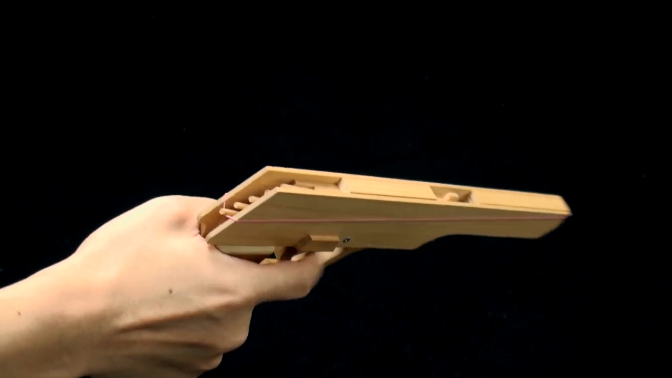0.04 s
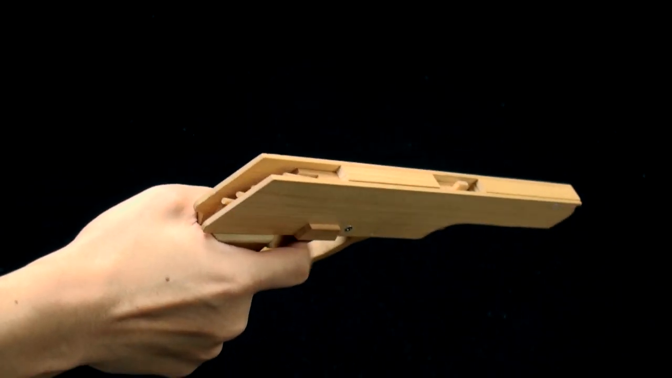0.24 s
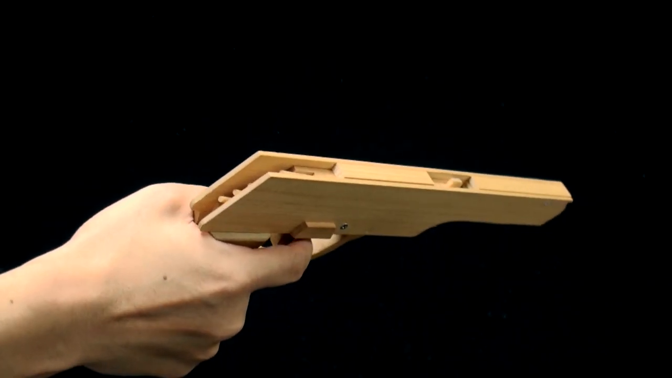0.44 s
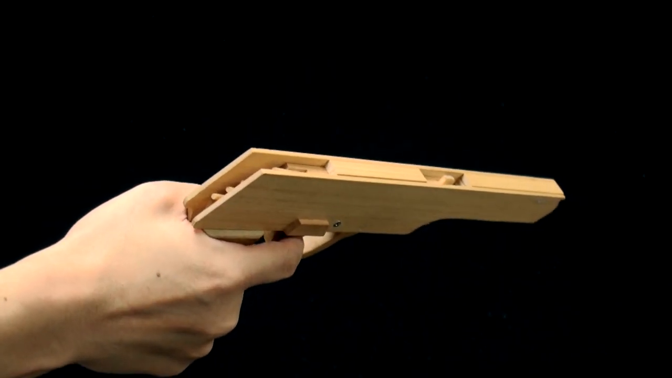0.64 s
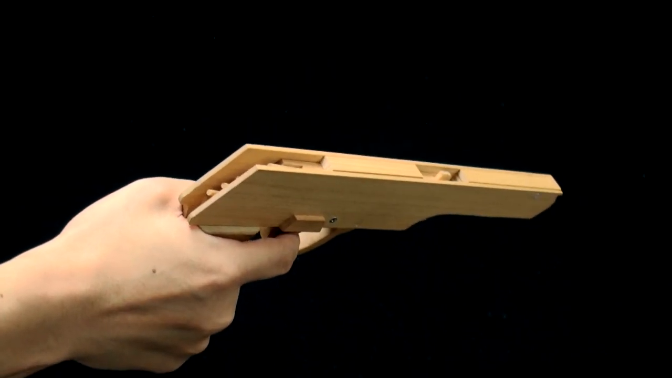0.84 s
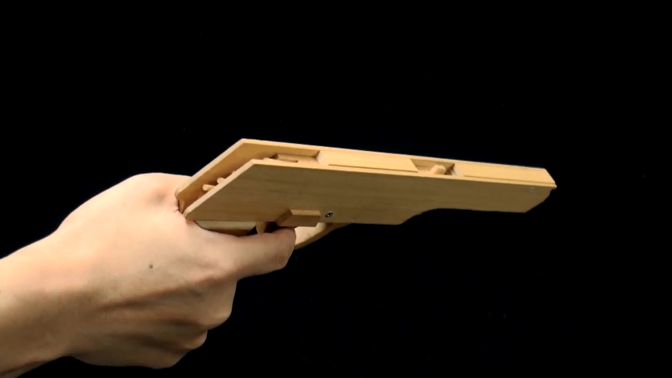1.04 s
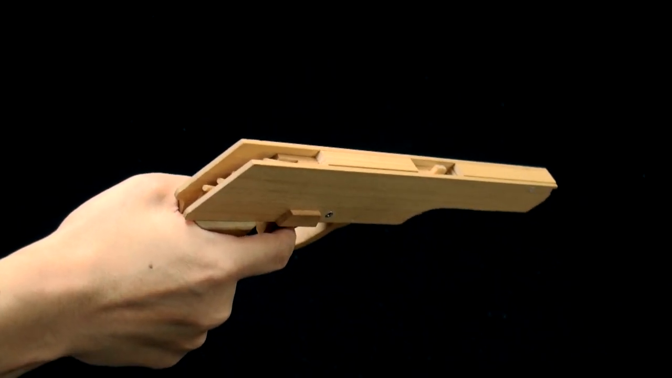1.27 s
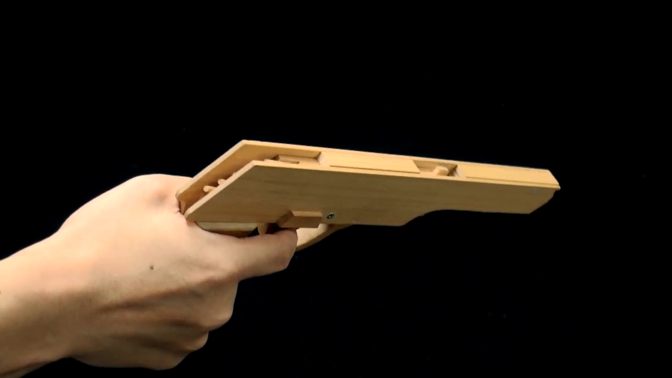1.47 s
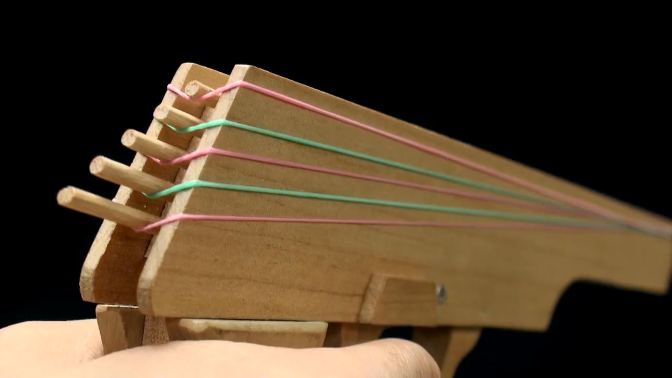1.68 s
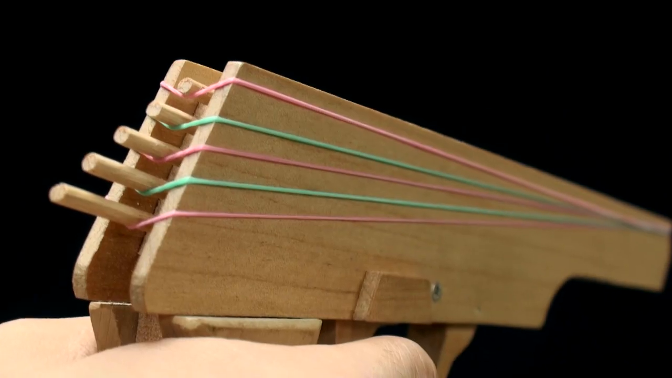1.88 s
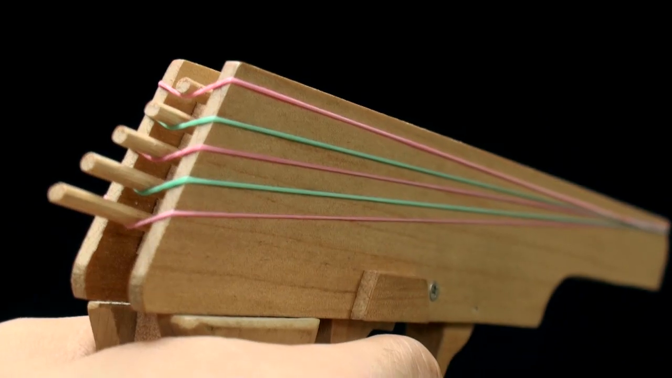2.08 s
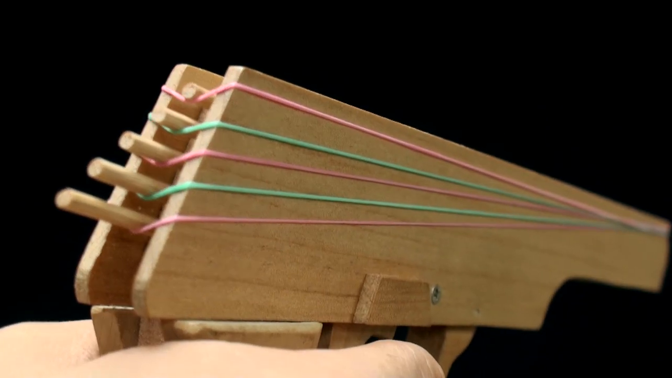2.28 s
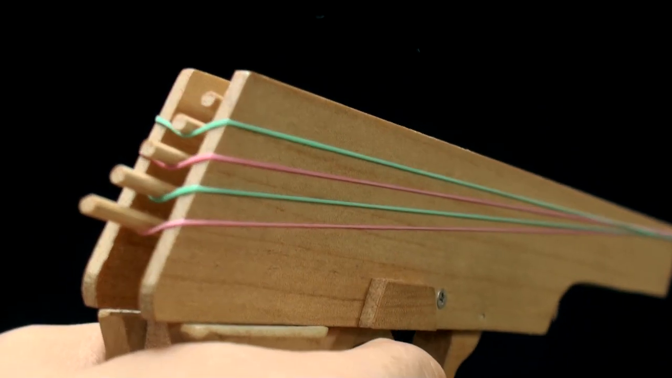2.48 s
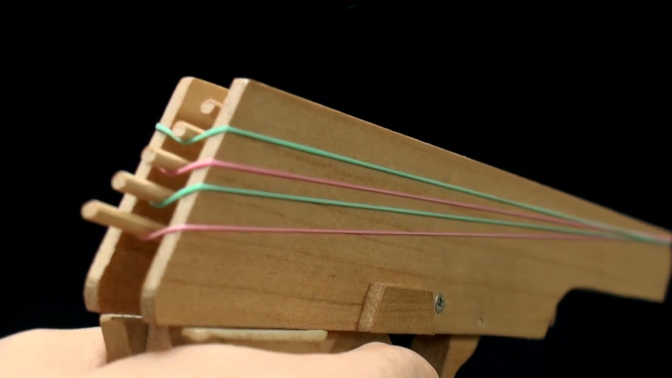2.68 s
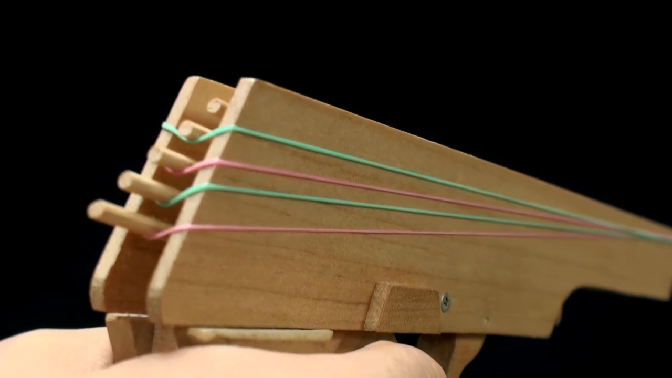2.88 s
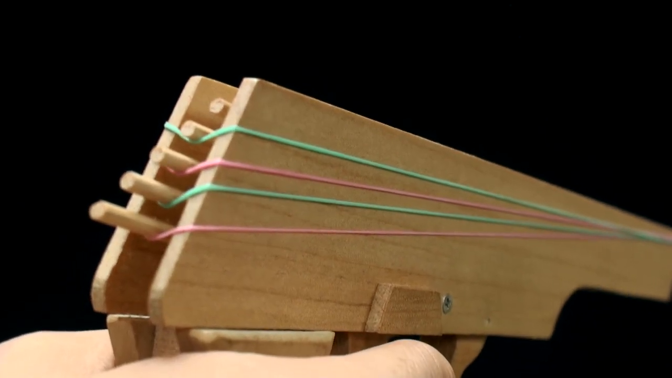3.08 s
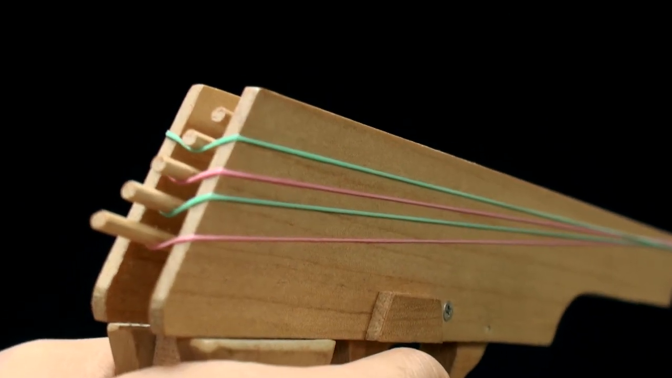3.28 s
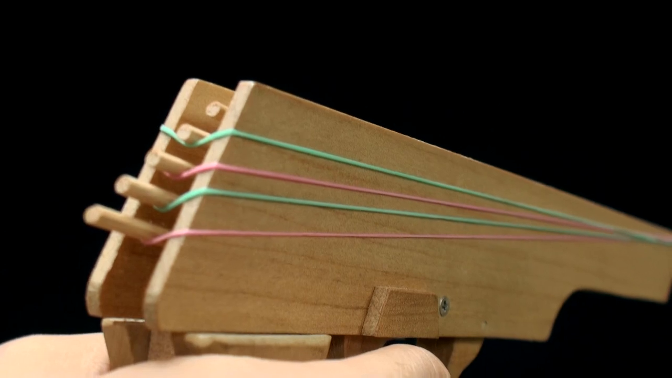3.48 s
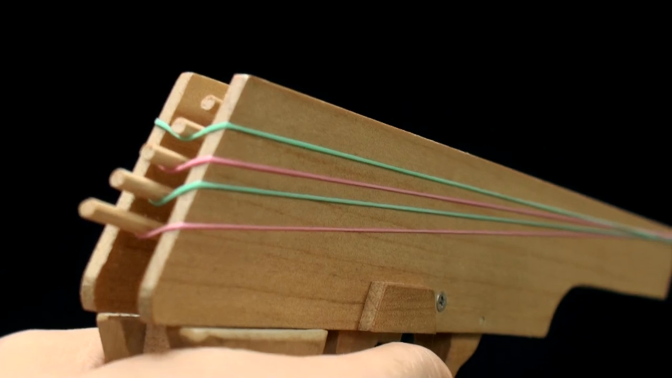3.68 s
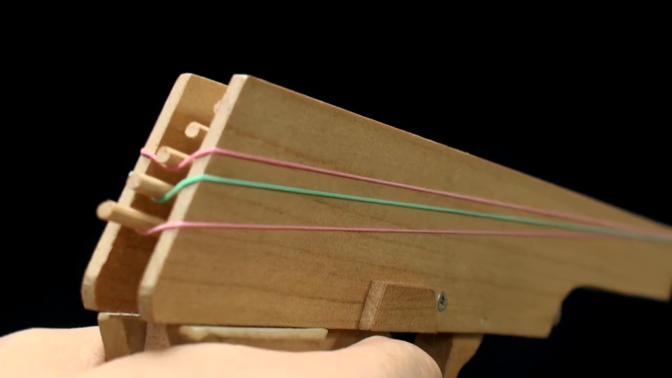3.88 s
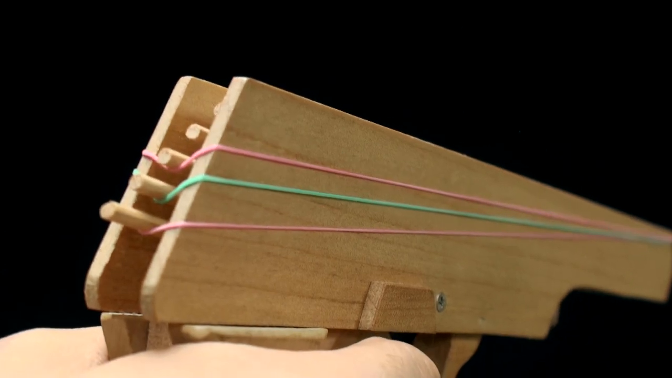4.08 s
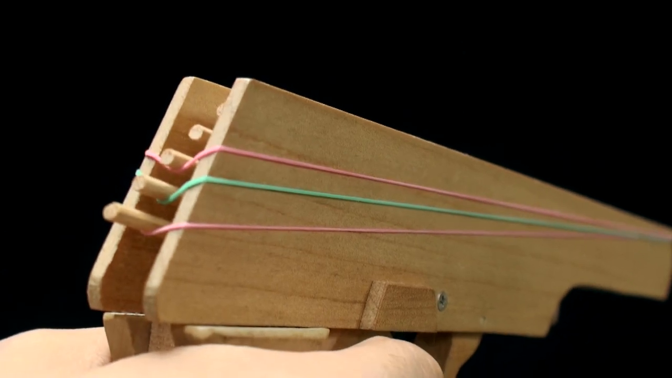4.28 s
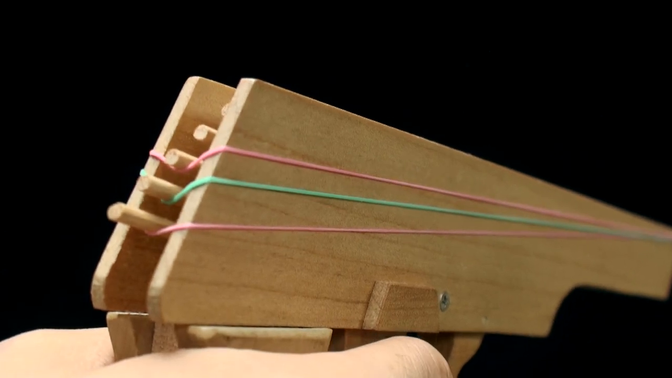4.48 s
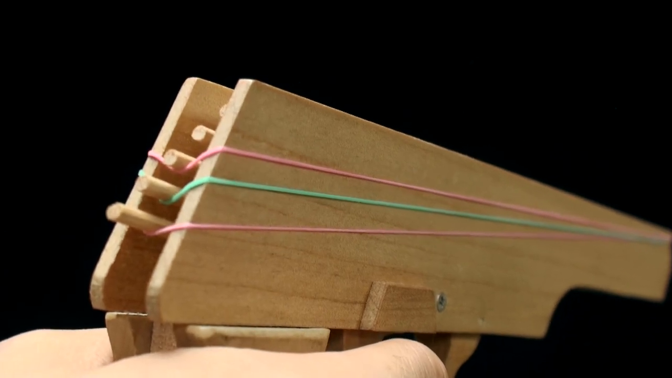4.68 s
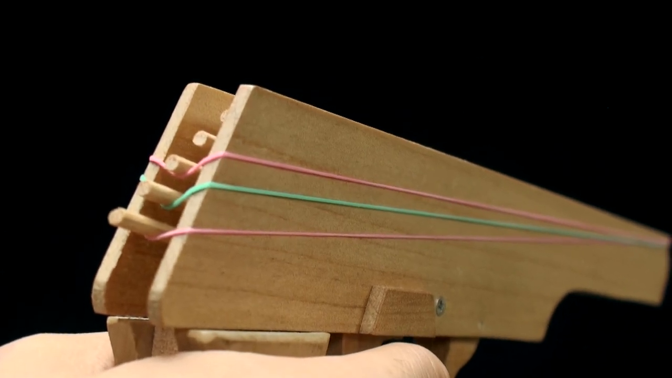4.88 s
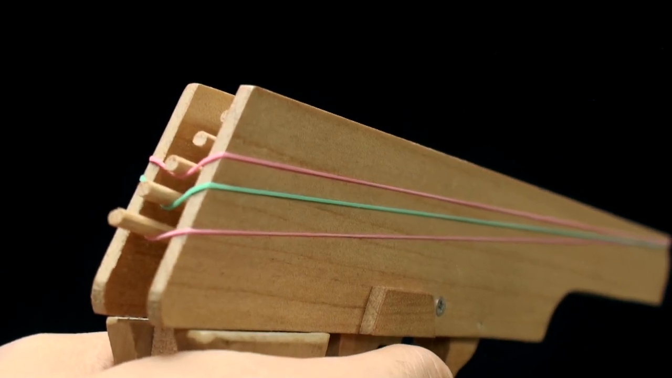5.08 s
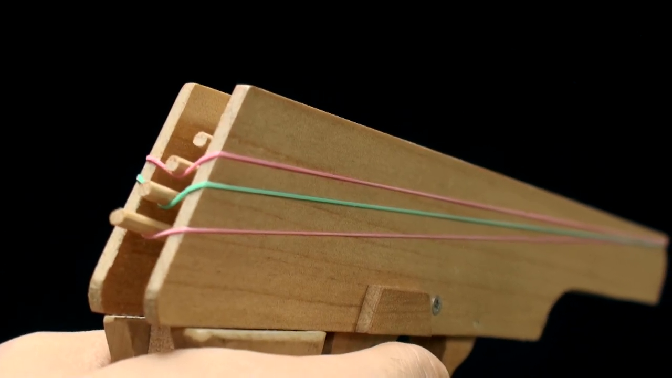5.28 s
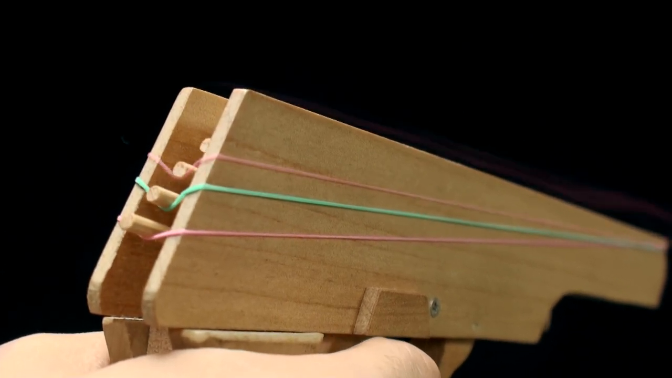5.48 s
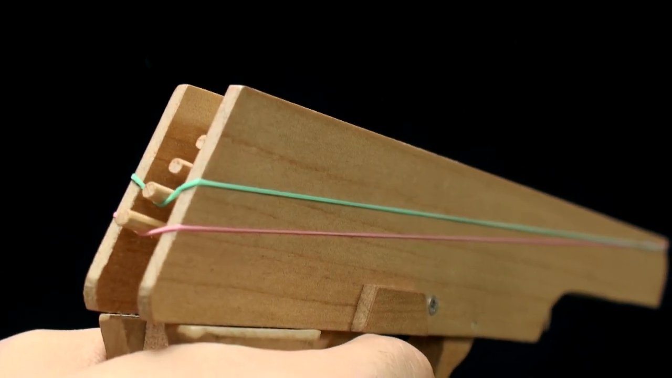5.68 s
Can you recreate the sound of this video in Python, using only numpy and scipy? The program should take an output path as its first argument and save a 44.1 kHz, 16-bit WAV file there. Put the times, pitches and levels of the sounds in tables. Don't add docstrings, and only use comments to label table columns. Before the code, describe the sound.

Steady low-level fan noise with a thin high whine. Two sharp slaps in quick succession open it, then a pause with only the fan. Three more shots come over a second apart, each peg snap leading into a loud, flattened band impact on something hollow. Tiny ticks and a light scrape of the trigger precede shots; strong wooden clacks mark its return. Close stereo microphone, reflective small room.

```python
import sys
import numpy as np
from scipy import signal
from scipy.fft import rfft, irfft, next_fast_len
from scipy.io import wavfile
from scipy.ndimage import uniform_filter1d

SR = 44100
rng = np.random.default_rng(int(sys.argv[2]) if len(sys.argv) > 2 else 0)


def persist_wave(psi):
    counts = np.round(np.clip(psi, -1, 1) * 32767).astype(np.int16)
    wavfile.write(sys.argv[1], SR, np.atleast_2d(counts).T)


def convert_level_to_amplitude(level_db):
    exponent = np.asarray(level_db, float) / 20
    return 10 ** exponent


N = 253134


def read(points, hz):
    f, value = np.transpose(points)
    return np.interp(np.log(hz + 1), np.log(f + 1), value)


def evened(x):
    return x / np.sqrt(np.mean(x ** 2) + 1e-20)


def bell(hz, centre_hz, width_hz):
    return 1 / (1 + (2 * (hz - centre_hz) / width_hz) ** 2)


def noise_pair(size, same, lead=((1, 0), (2, 0))):
    left, other = rfft(rng.standard_normal((2, size)))
    hz = np.fft.rfftfreq(size, 1 / SR)
    alike = np.clip(read(same, hz), 0, 1)
    shared = alike * left * np.exp(-1j * read(lead, hz))
    return np.array([left, shared + np.sqrt(1 - alike ** 2) * other])


# f/Hz, level/dB per Hz
WASH = [(12, -44), (25, 1), (45, 0), (129, -1.5), (356, -1.5), (900, -1.5), (2000, -6), (4680, -13.5),
        (6320, -16.5), (12500, -19), (13300, -59)]
# f/Hz, likeness/0-1
WASH_COHERENCE = [(60, 0.95), (150, 0.99), (380, 0.37), (950, 0.39), (2380, 0.13), (5980, 0.99),
                  (15000, 0.25)]
# f/Hz, lead/rad
WASH_LEAD = [(0, 2.5), (260, -1.24), (1460, 3), (5600, 0.71), (7750, 1.3), (11300, 1), (15500, -7)]
# f/Hz, level/dB rms
HUM = [(118.4, -76), (242.2, -72), (597.5, -76.5), (839.8, -74.5), (1260, -80.5), (1814, -82)]
# t/s, level/dB
CREEP = [(0, -3), (1.4, -3), (1.65, -0.4), (2.4, 0.1), (3.7, -0.06), (5.3, 0)]


def background():
    wash_db, whine_db = -55.5, -57.5
    whine_follow = 0.98
    size = next_fast_len(N, True)
    t, hz = np.arange(N) / SR, np.fft.rfftfreq(size, 1 / SR)
    creep_db = np.interp(t, *np.transpose(CREEP))

    wash_spectrum = noise_pair(size, WASH_COHERENCE, WASH_LEAD) * convert_level_to_amplitude(read(WASH, hz))
    wash = evened(irfft(wash_spectrum, size))[:, :N]
    whine_spectrum = noise_pair(size, WASH_COHERENCE, WASH_LEAD) * bell(hz, 5540, 790) ** 2.56
    whine = evened(irfft(whine_spectrum, size))[:, :N]

    drift = evened(uniform_filter1d(rng.standard_normal((len(HUM), N)), size=6000))
    hum = np.zeros(N)
    for (f, db), wander in zip(HUM, drift):
        hum += convert_level_to_amplitude(db) * np.sqrt(2) * np.sin(2 * np.pi * f * t + 0.62 * wander)
    return convert_level_to_amplitude(wash_db + creep_db) * wash + convert_level_to_amplitude(whine_db + whine_follow * creep_db) * whine + hum


def contact(length_s):
    u = np.arange(1024) / SR / length_s
    shape = np.minimum(u * 3.8, 1) * np.exp(-u ** 3)
    z = rfft(rng.standard_normal(1024) * shape)
    smooth_power = abs(uniform_filter1d(abs(z) ** 2, size=5))
    return irfft(z / np.sqrt(smooth_power + 1e-12)) * shape


def causal(gain_db):
    mirrored_db = np.r_[gain_db, gain_db[-2:0:-1]]
    log_gain = np.log(convert_level_to_amplitude(np.maximum(mirrored_db, -100)))
    response = np.fft.ifft(np.exp(np.conj(signal.hilbert(log_gain)))).real
    return response[:len(gain_db)]


# f/Hz, t60/s
ROOM = [(150, 0.36), (400, 0.38), (1000, 0.52), (2700, 0.44), (7000, 0.34), (14000, 0.24)]
# f/Hz, likeness/0-1
ROOM_COHERENCE = [(60, 1), (180, 0.84), (550, 0.8), (1650, 0.62), (4970, 0.81), (15000, 0.53)]


def room(early_db, gap_s, size):
    build_s, early_s, patchy_db = 0.00056, 0.016, 1.5
    z, hz = noise_pair(size, ROOM_COHERENCE), np.fft.rfftfreq(size, 1 / SR)
    t = np.arange(size) / SR
    tail = np.zeros((2, size))
    centres = [f for f, _ in ROOM]
    for band, (_, t60) in zip(np.eye(len(ROOM)), ROOM):
        share = read(list(zip(centres, band)), hz)
        clumps = np.interp(t, t[::128], rng.standard_normal(size // 128))
        tail += irfft(z * share) * convert_level_to_amplitude(patchy_db * clumps - 60 * t / t60) / np.sqrt(t60)
    tail *= 1 - np.exp(-np.maximum(t - gap_s, 0) / build_s)
    tail *= convert_level_to_amplitude(early_db * np.exp(-t / early_s))
    return tail / np.linalg.norm(tail[0])


def hits(table, tone, body, *, body_db, contact_s, wet_db, early_db, gap_s, near_db, pan_db,
         ring_db, boom, bright, size):
    out, hz = np.zeros((2, N)), np.fft.rfftfreq(4096, 1 / SR)
    ring_q = 6
    modes = sum(share * bell(hz, f, width) for f, width, share in body)
    colour = boom * bell(hz, 440, 760) + bright * (1 - bell(hz, 0, 8100))
    direct_db = near_db * bell(hz, 750, 550) - 4.5 * (1 - bell(hz, 0, 14000))
    pan = convert_level_to_amplitude(np.array([[pan_db], [-pan_db]]) / 2)
    for s, peak_db, ring_hz, colour_db in table:
        gain_db = read(tone, hz) + colour_db * colour + body_db * modes
        gain_db += ring_db * bell(hz, ring_hz, ring_hz / ring_q)
        blow = signal.fftconvolve(contact(contact_s), causal(gain_db + direct_db))
        blow *= convert_level_to_amplitude(peak_db) / np.sqrt(uniform_filter1d(blow ** 2, size=88).max())

        ring = causal(gain_db)
        ring *= np.linalg.norm(blow) / np.linalg.norm(ring)
        heard = convert_level_to_amplitude(wet_db) * signal.fftconvolve(ring[None], room(early_db, gap_s, size), axes=1)
        heard[:, :len(blow)] += blow * pan
        part = out[:, round(s * SR):][:, :heard.shape[1]]
        part += heard[:, :part.shape[1]]
    return out


# t/s, peak level/dB, ring f/Hz, colour/dB (higher is fuller)
SLAPS = [
    (.0005, -8, 1120, -8.5),
    (.194, -7, 2640, -3.5),
    (2.4429, -4.5, 2950, 2),
    (3.8841, -4, 4200, 0.1),
    (5.5668, -4, 1710, -11),
]
# f/Hz, level/dB per Hz
SLAP_TONE = [(35, -52.5), (60, -27), (130, -21.5), (250, -9), (450, -1), (700, -6), (1050, -8),
             (1600, -7.5), (2900, -7), (4500, -6.5), (7000, -5), (10500, -9), (14500, -17), (15500, -47)]
# f/Hz, width/Hz, share/0-1
TARGET = [(470, 30, 1), (595, 30, 1), (760, 40, .5), (1655, 40, .8), (1990, 25, .7), (2580, 50, .8),
          (2920, 40, .8), (3200, 40, .8), (4100, 60, .6), (6540, 80, .5), (1500, 250, .4), (2750, 450, .4)]


def slaps():
    return hits(SLAPS, SLAP_TONE, TARGET, body_db=5.5, contact_s=0.0014, wet_db=14.9, early_db=0.47,
                gap_s=0.0015, near_db=-1.0, pan_db=-1.6, ring_db=5.0, boom=1, bright=0.64, size=24576)


# t/s, peak level/dB, ring f/Hz, colour/dB (higher is brighter)
RATTLES = [
    (.096, -18.5, 2910, -7),
    (.173, -9.5, 2400, -10),
]
# f/Hz, level/dB per Hz
SNAP_TONE = [(120, -30), (250, -14), (780, -8.5), (1280, -7.5), (1950, 4), (2960, 0), (4300, 4),
             (7000, -0.5), (12200, -5.5), (14400, -10), (15600, -46)]
# f/Hz, width/Hz, share/0-1
FRAME = [(1710, 90, .45), (1925, 70, 1), (2450, 70, 1), (2585, 70, .9), (3150, 150, .7), (3850, 200, .5),
         (4450, 150, .5), (7500, 400, .8)]


def rattles():
    return hits(RATTLES, SNAP_TONE, FRAME, body_db=1.7, contact_s=0.013, wet_db=-1.0, early_db=0.2,
                gap_s=0.0021, near_db=0.2, pan_db=-0.4, ring_db=3.0, boom=0, bright=1, size=8192)


# t/s, peak level/dB, ring f/Hz, colour/dB (higher is brighter)
TICKS = [(.154, -22, 2190, 4), (2.115, -47.5, 2550, -20), (2.986, -47, 1500, -5), (3.009, -47, 1300, -12),
         (3.629, -43.5, 2600, -23), (3.7325, -41, 7040, 14), (3.738, -43, 1540, -6),
         (3.789, -35.5, 4530, 6), (3.8323, -31.5, 7040, 22), (4.385, -50, 4930, 3), (4.395, -43, 1830, -1),
         (4.401, -48, 3000, -28), (4.514, -38, 3970, 0), (5.051, -57, 2500, -13), (5.237, -50.5, 2500, -22),
         (5.387, -36.5, 2080, 6), (5.394, -35.5, 3500, 10), (5.401, -43, 2300, -11), (5.407, -37, 2290, 19),
         (5.511, -47, 2980, 12), (5.5155, -45, 3320, -8)]
# f/Hz, level/dB per Hz
TICK_TONE = [(290, -46), (500, -43.5), (1210, -0.5), (2070, 5.5), (4540, 3.5), (6030, -4), (11000, -9.5),
             (14500, -31)]


def ticks():
    return hits(TICKS, TICK_TONE, FRAME, body_db=0.88, contact_s=0.0017, wet_db=-2.0, early_db=2.8,
                gap_s=0.0011, near_db=0.1, pan_db=-0.6, ring_db=9.0, boom=-0.15, bright=1, size=8192)


# t/s, peak level/dB, ring f/Hz, colour/dB (higher is brighter)
SNAPS = [
    (.1715, -8.5, 2430, -9.5),
    (2.4128, -11.5, 1740, -4),
    (3.8558, -14.5, 2240, -4),
    (3.8795, -20.5, 2200, -4),
    (5.5356, -13, 4350, -4),
    (5.538, -14, 2230, -12),
]


def snaps():
    return hits(SNAPS, SNAP_TONE, FRAME, body_db=1.9, contact_s=0.0032, wet_db=-0.52, early_db=5.3,
                gap_s=0.0017, near_db=0.088, pan_db=-0.3, ring_db=6.5, boom=0, bright=1, size=24576)


# f/Hz, level/dB, t60/s
STAND = [(2030, -40.5, 1.13), (3050, -42, 1)]
# t/s, level/dB
STAND_HITS = [
    (2.4424, -0.5),
    (3.8842, -3),
]


def stand():
    out, t = np.zeros(N), np.arange(SR) / SR
    ring = sum(convert_level_to_amplitude(db - 60 * t / t60) * np.sin(2 * np.pi * hz * t) for hz, db, t60 in STAND)
    for s, db in STAND_HITS:
        out[round(s * SR):][:SR] += convert_level_to_amplitude(db) * ring
    return out


# t/s, peak level/dB, ring f/Hz, colour/dB (higher is brighter)
SCRAPES = [
    (3.028, -53, 3000, -6),
    (3.043, -51, 3300, -4),
    (3.057, -47, 3300, -1),
    (3.072, -63, 3300, -1),
    (3.839, -42, 3980, -11),
    (4.394, -50, 2980, 2),
    (5.388, -43.5, 2230, 5),
]


def scrapes():
    return hits(SCRAPES, TICK_TONE, FRAME, body_db=2.3, contact_s=0.012, wet_db=-1.6, early_db=0.1,
                gap_s=0.0015, near_db=0.1, pan_db=-0.6, ring_db=0.0, boom=0, bright=0.93, size=8192)


# t/s, peak level/dB, ring f/Hz, colour/dB (higher is fuller and duller)
CLACKS = [
    (3.0921, -6.5, 1900, 3),
    (4.5175, -3, 3920, -11),
]
# f/Hz, level/dB per Hz
CLACK_TONE = [(120, -65), (300, -32), (665, -18), (1300, -15), (1710, -5.5), (2510, -7.5), (4410, -12),
              (5300, -19), (7480, -24), (9000, -27), (11800, -33), (14500, -64)]


def clacks():
    return hits(CLACKS, CLACK_TONE, FRAME, body_db=10, contact_s=0.003, wet_db=-1.64, early_db=18.0,
                gap_s=0.0031, near_db=10.0, pan_db=0.14, ring_db=1.0, boom=0.86, bright=-0.53, size=24576)


def scene():
    blows = slaps() + rattles() + ticks() + snaps() + stand() + scrapes() + clacks()
    blow_balance = convert_level_to_amplitude(np.array([[-0.6], [0.6]]))
    background_balance = convert_level_to_amplitude(np.array([[0.4], [-0.4]]))
    return blows * blow_balance + background() * background_balance


def low_pass(x):
    return signal.sosfilt(signal.butter(12, 15940, fs=SR, output="sos"), x)


def record(dry):
    attack_s, limit_db, limit_share, recover_db_per_s = 0.00099, -11, 0.99, 428
    ahead = 24
    peak_db = 20 * np.log10(uniform_filter1d(abs(dry).max(0), size=5) + 1e-9)
    fall_db = np.arange(N) * recover_db_per_s / SR
    held_db = np.maximum.accumulate(peak_db + fall_db) - fall_db
    over_db = np.maximum(np.r_[held_db[ahead:], held_db[-ahead:]] - limit_db, 0)
    keep = np.exp(-1 / (attack_s * SR))
    cut_db = limit_share * signal.lfilter([1 - keep], [1, -keep], over_db)
    mix = np.clip(dry / convert_level_to_amplitude(cut_db), -1, 1)
    return low_pass(mix)


dry = scene()
out = record(dry)
persist_wave(out)
```